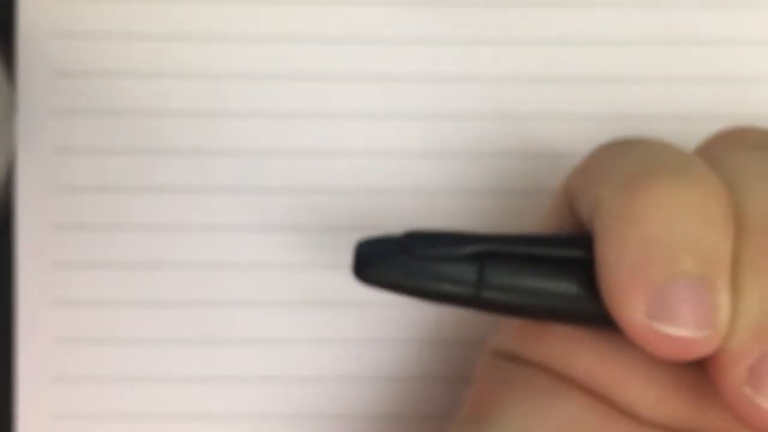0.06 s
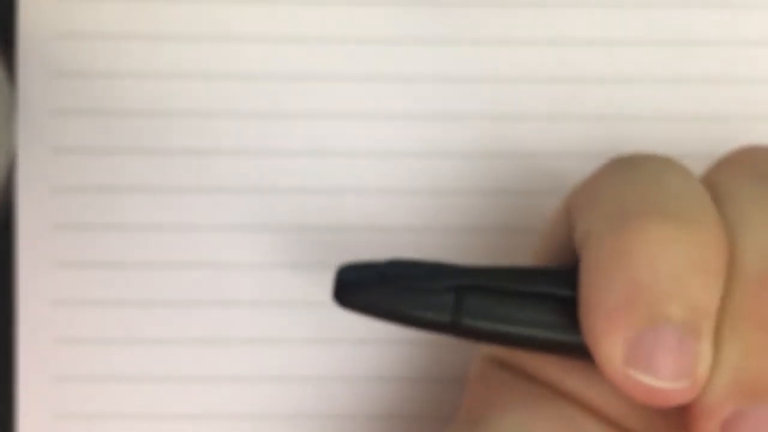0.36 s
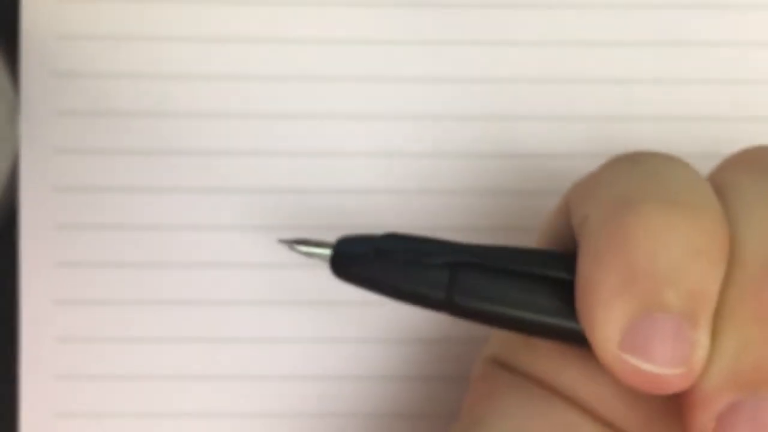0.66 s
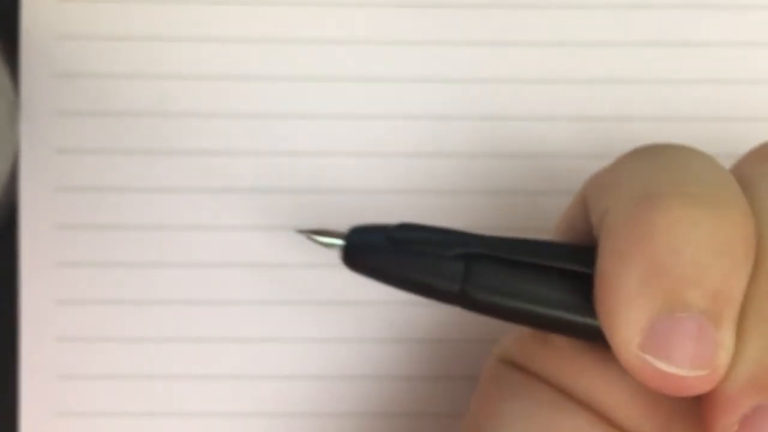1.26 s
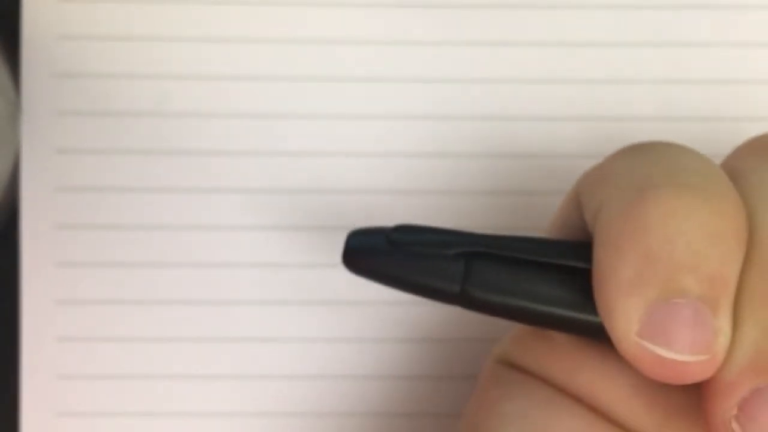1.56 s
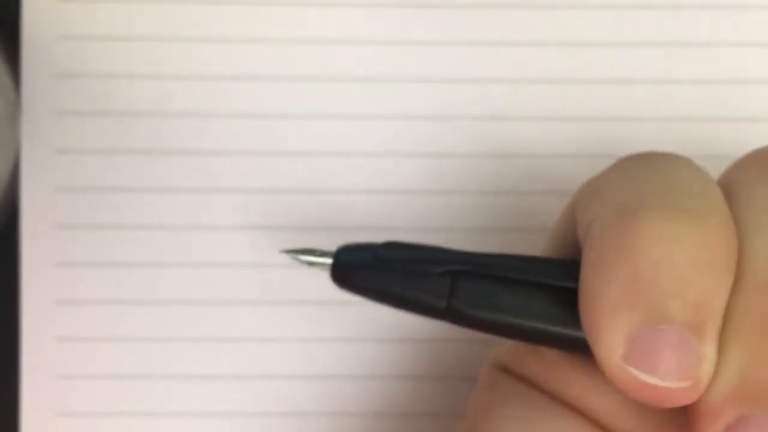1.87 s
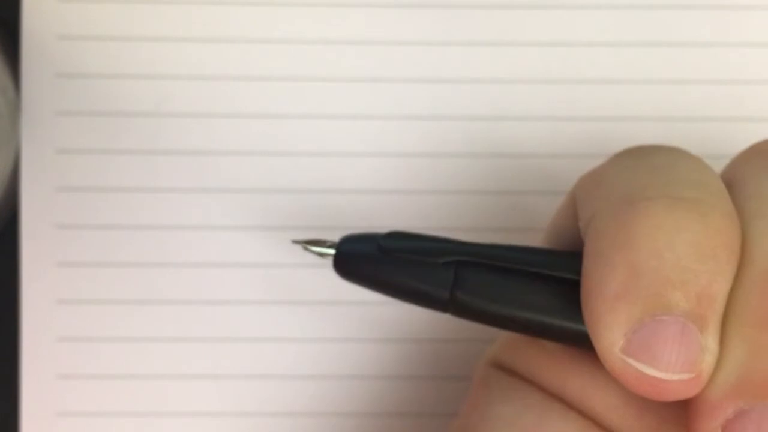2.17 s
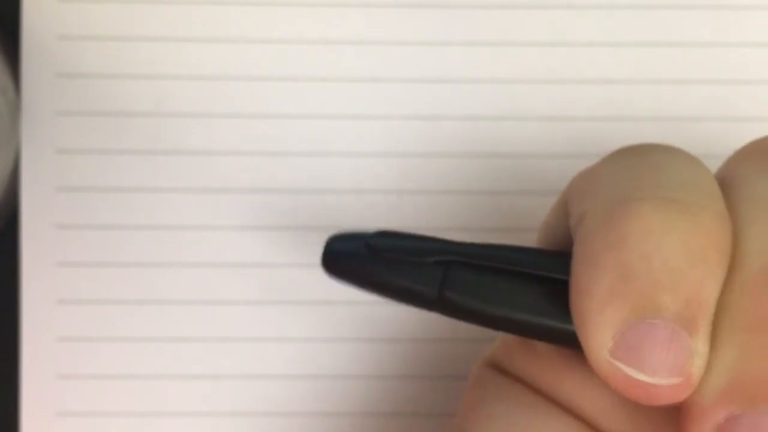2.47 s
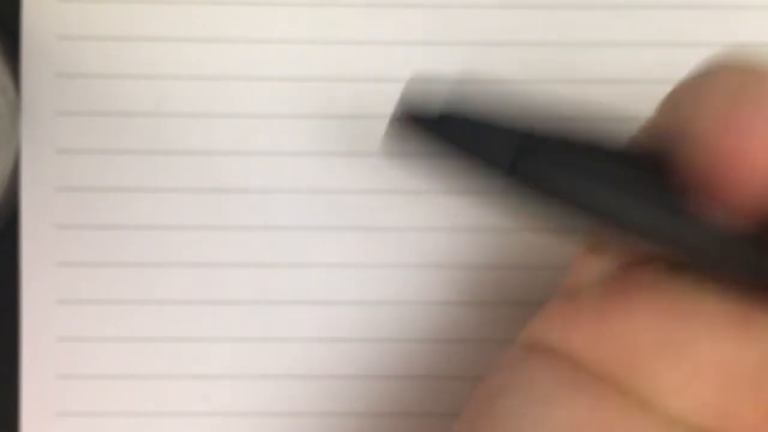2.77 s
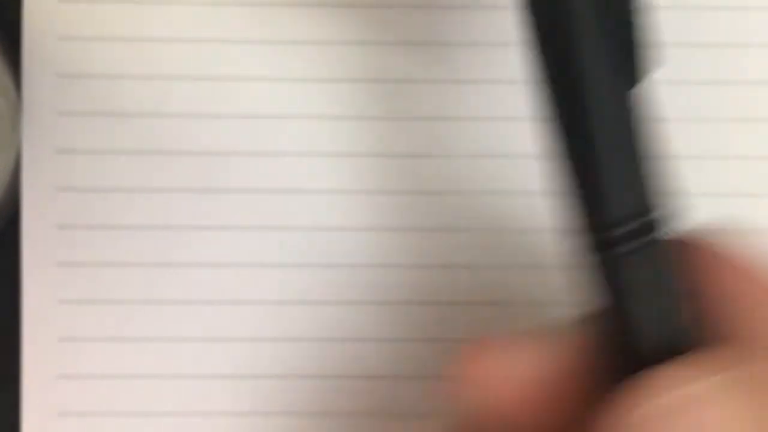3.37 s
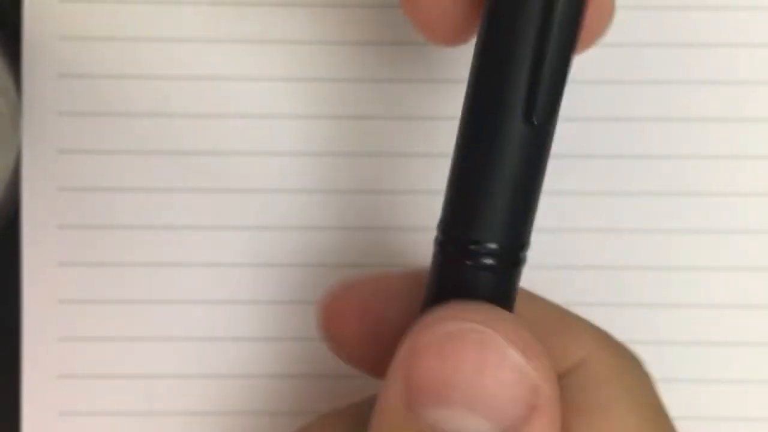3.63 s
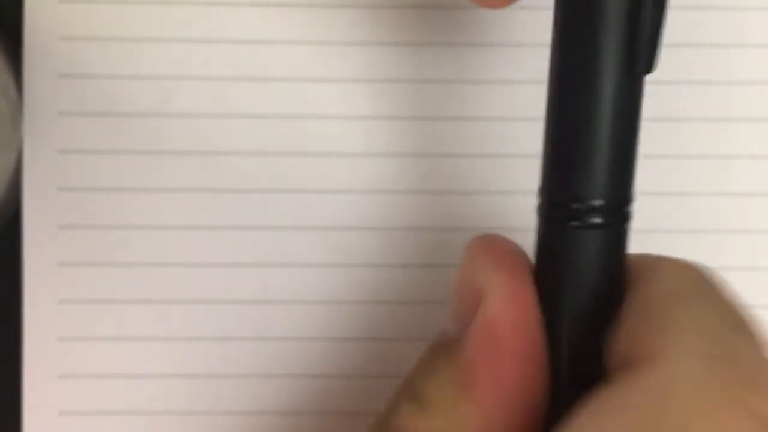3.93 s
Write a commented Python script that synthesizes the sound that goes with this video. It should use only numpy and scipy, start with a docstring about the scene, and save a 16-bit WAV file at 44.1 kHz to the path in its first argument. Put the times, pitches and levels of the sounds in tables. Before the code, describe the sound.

A retractable pen clicks four times in crisp double clicks, followed by faint finger handling.

```python
"""Four crisp double clicks of a retractable pen, close up: tip out, in, out, in.
Each push trips the cam with a click and each release ends in a sharp snap; the retracting refill
bounces on its spring. The plunger scrapes, fingers slide and tap on the barrel, and a small,
dry room rumbles underneath."""
import sys
import numpy as np
from scipy import signal
from scipy.fft import rfft, irfft
from scipy.io import wavfile
from scipy.ndimage import map_coordinates

SR = 44100
rng = np.random.default_rng(int(sys.argv[2]) if len(sys.argv) > 2 else 0)


def unload_audio(sound):
    """Save the sound as a 16-bit wav file, at the path given as the first command line argument."""
    columns = np.transpose(np.atleast_2d(sound))
    # keep every value between -1 and 1, then stretch to whole-number steps
    steps = np.round(np.clip(columns, -1, 1) * 32767)
    wavfile.write(sys.argv[1], SR, steps.astype(np.int16))


N = 176400
TIME, HZ = np.arange(N) / SR, np.fft.rfftfreq(N, 1 / SR)
HIT = 4096  # samples in one contact
HIT_TIME, HIT_HZ = np.arange(HIT) / SR, np.fft.rfftfreq(HIT, 1 / SR)
TOP_HZ = 16000
# edges of the six EQ bands of clicks and snaps: (frequency [Hz])
CLICK_BANDS = [300, 2000, 3300, 5000, 8000, 10700, 16000]
# edges of the four EQ bands of ticks and taps: (frequency [Hz])
TICK_BANDS = [300, 2000, 5000, 9000, 16000]


def amp(db):
    """Decibels to gain."""
    return 10 ** (np.asarray(db) / 20)


def unit(x):
    """Scale to rms 1."""
    return x / np.sqrt(np.mean(x ** 2) + 1e-20)


def along(points, hz):
    """Read a (frequency [Hz], value) curve on a log axis."""
    freqs, values = np.transpose(points)
    return np.interp(np.log(hz + 1), np.log(freqs + 1), values)


def noise(colour):
    """Coloured noise of rms 1."""
    return unit(irfft(rfft(rng.standard_normal(N)) * amp(along(colour, HZ)), N))


def wobble(rate):
    """A smooth random curve, rate knots a second."""
    return map_coordinates(rng.standard_normal(int(N * rate / SR) + 4), [TIME * rate])


def swell(peak_s, rise, fall):
    """Distance from a stroke's peak: 0 there, 1 a rise time before and a fall time after."""
    return np.maximum((peak_s - TIME) / rise, (TIME - peak_s) / fall)


def causal(gain):
    """Minimum-phase response with this gain: EQ without pre-ring."""
    cepstrum = irfft(np.log(np.maximum(gain, 1e-6)))
    cepstrum[1:HIT // 2] *= 2
    cepstrum[HIT // 2 + 1:] = 0
    return np.exp(rfft(cepstrum))


def add(out, s, x):
    """Mix x into out at time s."""
    i = max(round(s * SR), 0)
    out[i:i + len(x)] += x[:max(N - i, 0)]


def equalise(x, edges, levels):
    """Bring each band of a contact to its level, as rms over 5 ms."""
    spectrum = rfft(x)
    centres = np.sqrt(np.multiply(edges[:-1], edges[1:]))
    bands = [(HIT_HZ >= lo) & (HIT_HZ < hi) for lo, hi in zip(edges, edges[1:])]
    span = HIT * SR * .005 / 2
    for _ in range(2):
        power = [np.sum(abs(spectrum[band]) ** 2) / span for band in bands]
        eq = np.c_[centres, levels - 10 * np.log10(power)]
        spectrum = spectrum * causal(amp(along(eq, HIT_HZ)))
    return irfft(spectrum)


def ringing(modes, scatter_db, detune_share):
    """One blow's damped modes, with random spread in level and pitch."""
    hz, db, t60 = np.transpose(modes)[:, :, None]
    size, detune = rng.standard_normal((2, len(modes), 1))
    sign = (-1) ** np.arange(len(modes))[:, None]
    decay = amp(db + scatter_db * size - 60 * HIT_TIME / t60)
    tones = np.sin(2 * np.pi * hz * (1 + detune_share * detune) * HIT_TIME)
    return np.sum(sign * decay * tones, axis=0)


def contacts(rows, edges, modes, crack_db, crack_t60, attack_s, band_hz):
    """Hard plastic contacts: a brief crack and quickly damped modes, EQ'd hit by hit."""
    out = np.zeros(N)
    attack = 1 - np.exp(-(HIT_TIME / attack_s) ** 2)
    bandpass = signal.butter(2, band_hz, "band", fs=SR, output="sos")
    for s, *levels in rows:
        ring = ringing(modes, scatter_db=0, detune_share=0.018)
        crack = amp(crack_db - 60 * HIT_TIME / crack_t60) * rng.standard_normal(HIT)
        hit = signal.sosfilt(bandpass, (ring + crack) * attack)
        add(out, s - attack_s / 2, equalise(hit, edges, np.array(levels)))
    return out


def background():
    """Room rumble, still air, and mic hiss that a noise gate lifts around the clicks and briefly drops."""
    # colours of the three layers: (frequency [Hz], relative level [dB])
    rumble = [(20, -31.5), (42, -11.5), (58, -0.5), (72, -3.5), (95, 4.5), (115, -4.5), (145, -13),
              (165, -13), (232, -22), (450, -38), (700, -58), (2000, -120)]
    air = [(100, -14), (400, 2.5), (900, 1.5), (1400, -1), (2150, -7), (2800, -14), (16000, -34.5)]
    hiss = [(300, -13), (1500, 1), (6000, -1.5), (9000, -3.5), (10500, -6.5), (16000, -8.5)]
    # the gated hiss, as a set curve: (time [s], level [dB])
    hiss_level = [(0, -75), (.6, -79.5), (.7, -66.5), (1.77, -67.5), (1.79, -78), (1.86, -77),
                  (1.89, -67.5), (2.92, -66), (3.25, -70), (3.5, -73.5), (3.7, -77), (4, -73)]
    hiss_gain = amp(np.interp(TIME, *np.transpose(hiss_level)))
    return amp(-40.5) * noise(rumble) + amp(-72) * noise(air) + hiss_gain * noise(hiss)


def room_reverb(x):
    """A short, weak tail and one reflection off a near wall."""
    # the room's decay: (frequency [Hz], t60 [s])
    decay = [(300, 0.021), (3000, 0.12), (14000, 0.053)]
    tail_db, wall_db, wall_s = -25.5, -34, .0105
    hz, t, spectra = signal.stft(rng.standard_normal(SR // 3), SR, nperseg=256)
    tail = signal.istft(spectra * amp(-60 * t / along(decay, hz)[:, None]), SR, nperseg=256)[1]
    tail *= amp(tail_db) / np.linalg.norm(tail)
    tail[round(wall_s * SR)] += amp(wall_db)
    return signal.fftconvolve(x, tail)[:N]


def finger_slides():
    """Skin rubs one barrel resonance a stroke: a narrow one squeaks, a wide one brushes."""
    # strokes: (peak time [s], rise [s], fall [s], level [dB], resonance [Hz], width [Hz])
    strokes = [(.613, 0.019, 0.0089, -57, 7400, 1200), (.648, .008, .045, -59.5, 7200, 1000),
               (2.847, 0.0063, 0.02, -63, 6800, 6100), (3.015, 0.076, 0.18, -59, 4380, 696),
               (3.075, 0.092, 0.13, -61, 9000, 11100), (3.13, .19, 0.11, -60.5, 1660, 850),
               (3.155, 0.091, 0.063, -61, 4230, 600), (3.361, 0.076, 0.096, -67, 6250, 7600),
               (3.58, .04, .024, -69.5, 8340, 550)]
    skirt_db, grain_db, grain_per_s = -8, 2, 450
    out, freqs = np.zeros(N), HZ + 1
    for s, rise, fall, db, hz, width in strokes:
        offset = (freqs - hz ** 2 / freqs) / 2
        resonance = 1 / (1 + (offset / width) ** 2) ** 2
        skirt = amp(skirt_db) / (1 + (offset / hz) ** 2) ** 2
        friction = irfft(rfft(rng.standard_normal(N)) * (resonance + skirt), N)
        friction *= amp(grain_db * wobble(grain_per_s))
        out += amp(db - 20 * swell(s, rise, fall) ** 2) * unit(friction)
    return out


def grip_knock():
    """A soft, hollow knock as the grip loosens."""
    # hollow ring: (frequency [Hz], relative level [dB], t60 [s])
    modes = [(1270, 3.5, 0.011), (1770, 4, 0.0081)]
    out = np.zeros(N)
    add(out, s=2.8792, x=amp(-44) * ringing(modes, scatter_db=-1.5, detune_share=0.012))
    return out


def finger_taps():
    """Light taps on the barrel as the grip changes."""
    # tap cues: (time [s], level in each of TICK_BANDS [dB])
    cues = [(3.858, -59.5, -55, -50, -54.5), (3.8783, -59, -60, -52, -47.5),
            (3.8808, -58.5, -52, -45.5, -58), (3.9251, -56, -53.5, -42, -45.5),
            (3.9721, -56, -49, -42.5, -45)]
    # barrel ring: (frequency [Hz], relative level [dB], t60 [s])
    modes = [(1110, 2, 0.0083), (1870, -4, 0.014), (4160, 1, 0.015), (5420, 8, 0.007),
             (7700, -14.5, 0.0047), (10700, -21, 0.0042)]
    return contacts(cues, TICK_BANDS, modes,
                    crack_db=13, crack_t60=.012, attack_s=.00057, band_hz=(500, 14000))


def plunger_scrape():
    """The plunger sticks and slips along the barrel: fine grit over a smoother hiss."""
    # strokes: (peak time [s], rise [s], fall [s], level [dB])
    strokes = [(0.455, 0.051, 0.06, -48), (.846, .02, 0.025, -48.5), (1.383, .008, 0.039, -38.5),
               (1.9, 0.031, 0.049, -48), (2.106, 0.017, 0.024, -56), (2.548, 0.0096, 0.027, -36.5)]
    # friction colour: (frequency [Hz], relative level [dB])
    colour = [(300, -28), (900, -8), (2500, -5), (3650, 7.5), (4900, -2), (7100, -0.5), (10500, -5.5),
              (15000, -20)]
    slips_per_s, hiss_db = 900, -1.5
    envelope = sum(amp(db - 20 * swell(s, rise, fall)) for s, rise, fall, db in strokes)
    slips = (rng.random(N) < slips_per_s / SR) * rng.standard_normal(N)
    tick = irfft(causal(amp(along(colour, HIT_HZ))))
    grit = signal.fftconvolve(slips, tick)[:N]
    return envelope * unit(unit(grit) + amp(hiss_db) * noise(colour))


def rattle():
    """Loose parts tick and bounce inside the barrel."""
    # tick cues: (time [s], level in each of TICK_BANDS [dB])
    cues = [(.4247, -69, -53, -57, -61), (.4272, -59, -48, -56, -62), (.4336, -60, -56, -52, -66),
            (.4571, -64, -46.5, -50, -46.5), (.464, -55.5, -47.5, -70, -63), (.8015, -50, -47, -62, -60.5),
            (.8143, -55, -49.5, -59, -62), (.8471, -42, -39.5, -53.5, -56.5),
            (.8575, -53.5, -47, -61.5, -56.5), (1.3469, -51.5, -42.5, -68, -61),
            (1.353, -56, -44, -57.5, -59), (1.3819, -51.5, -35, -34.5, -34), (1.3907, -42, -41, -43.5, -45),
            (1.4002, -60, -34, -44, -58.5), (1.8735, -56, -49.5, -62.5, -58), (1.8846, -53, -63, -52, -66),
            (1.9028, -61.5, -33.5, -41.5, -43.5), (1.9064, -53, -39, -53.5, -51),
            (2.1227, -47.5, -41, -53, -56), (2.1289, -54.5, -43, -53, -55.5),
            (2.3357, -53.5, -43.5, -53.5, -56.5), (2.5165, -60, -41, -54, -54.5),
            (2.5461, -51.5, -30, -35.5, -32), (2.5496, -51, -33.5, -46, -51.5),
            (2.555, -45.5, -30.5, -50, -47.5), (2.565, -61.5, -40.5, -53, -59),
            (2.5796, -61, -43.5, -61, -59)]
    # ring of the parts: (frequency [Hz], relative level [dB], t60 [s])
    modes = [(900, -8, 0.0056), (1582, -11, 0.0044), (3090, -0.5, 0.0044), (3670, -3.5, 0.0076),
             (4280, -2.5, 0.0064), (6380, -7.5, 0.0089), (11500, -10.5, 0.0025)]
    return contacts(cues, TICK_BANDS, modes,
                    crack_db=.5, crack_t60=.007, attack_s=.0007, band_hz=(344, 10500))


def spring_pings():
    """The loose spring pings against the barrel, each time at a different pitch."""
    # ping cues: (time [s], gain [dB], pitch [Hz])
    cues = [(.398, -40.5, 4360), (0.4923, -44.5, 3720), (.867, -47, 3100), (1.114, -45, 3380),
            (1.1299, -44, 3560), (1.406, -35, 4010), (1.419, -37, 3800), (1.4257, -39.5, 3310),
            (1.432, -44, 4150), (1.9072, -26.5, 3280), (2.0637, -39, 3420), (2.585, -39, 3240),
            (2.6035, -39, 3530), (2.6147, -41.5, 3520)]
    # spring partials: (ratio to the pitch, relative level [dB], t60 [s])
    partials = [(1, 3, 0.01), (1.16, -3.5, .006), (1.8, -8, 0.0044)]
    out = np.zeros(N)
    attack = 1 - np.exp(-(HIT_TIME / 0.00032) ** 2)
    for s, db, hz in cues:
        ring = ringing(np.multiply(partials, [hz, 1, 1]), scatter_db=0.5, detune_share=0.011)
        add(out, s, amp(db) * attack * ring)
    return out


def push_clicks():
    """The cam trips as the button goes down."""
    # push cues: (time [s], pitch factor, level in each of CLICK_BANDS [dB])
    cues = [(.6842, 1.068, -40, -33, -29.5, -38.5, -35, -35),
            (1.2134, .97, -38, -34.5, -41, -38, -35.5, -33.5),
            (1.9598, 1.087, -42, -28, -33.5, -36, -35, -41.5),
            (2.401, 0.96, -40.5, -30.5, -32.5, -35, -33.5, -31.5)]
    # cam ring: (frequency [Hz], relative level [dB], t60 [s])
    modes = [(2294, -3, 0.0029), (3167, -1, 0.012), (3720, 6, 0.0034), (4270, -2.5, 0.0072),
             (5740, -8.5, 0.01), (6790, -6, 0.0055), (9650, 4, 0.0047), (12400, 5.5, 0.0069),
             (15300, 6, .006)]
    return sum(contacts([(s, *levels)], CLICK_BANDS, np.multiply(modes, [pitch, 1, 1]),
                        crack_db=3, crack_t60=.011, attack_s=.00035, band_hz=(397, TOP_HZ))
               for s, pitch, *levels in cues)


def lock_snaps():
    """The cam locks with a sharp snap, tip out."""
    # lock cues: (time [s], level in each of CLICK_BANDS [dB])
    cues = [(.8285, -31.5, -38.5, -29.5, -23.5, -22.5, -23), (2.0922, -34, -39, -33, -24, -20.5, -28.5)]
    # ring of the lock: (frequency [Hz], relative level [dB], t60 [s])
    modes = [(950, -0.5, 0.0063), (1850, -10.5, 0.0094), (3780, 1, 0.009), (4450, -10, 0.012),
             (6900, 5.5, 0.0084), (8200, 3, 0.0014), (8800, 6.5, 0.006), (9770, 4.5, .007),
             (11450, 4, 0.0035), (11870, -0.5, 0.008), (13040, -4, 0.0078)]
    return contacts(cues, CLICK_BANDS, modes,
                    crack_db=2.5, crack_t60=.008, attack_s=.00005, band_hz=(680, 15000))


def retract_snaps():
    """The refill shoots back against its stop, tip in."""
    # retract cues: (time [s], level in each of CLICK_BANDS [dB])
    cues = [(1.3762, -46, -32, -29, -29.5, -26.5, -21.5), (2.5404, -40.5, -33.5, -31, -33.5, -34.5, -25)]
    # ring of the stop: (frequency [Hz], relative level [dB], t60 [s])
    modes = [(1703, -11, 0.0081), (3150, -9.5, .016), (3970, -13, 0.034), (6190, 12, .007),
             (8540, -6, 0.0053), (11410, 8.5, 0.0051), (12200, -4, 0.0073), (15400, -5.5, .006)]
    return contacts(cues, CLICK_BANDS, modes,
                    crack_db=-2, crack_t60=.014, attack_s=.00059, band_hz=(298, 15820))


def scene():
    """The pen and the hand in the room, in mono."""
    pen = push_clicks() + lock_snaps() + retract_snaps() + rattle() + spring_pings() + plunger_scrape()
    hand = finger_slides() + grip_knock() + finger_taps()
    foley = pen + hand
    return (foley + room_reverb(foley) + background())[None]


def record(dry):
    """The microphone rolls off steeply above TOP_HZ."""
    return irfft(rfft(dry) / np.sqrt(1 + (HZ / TOP_HZ) ** 170), N)


dry = scene()
out = record(dry)
unload_audio(out)
```